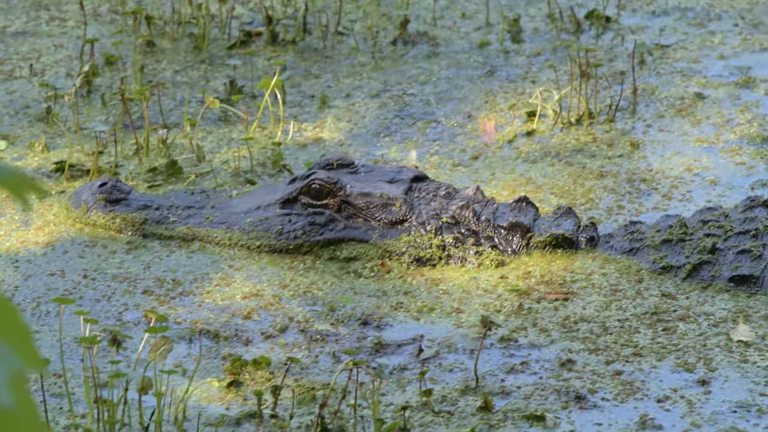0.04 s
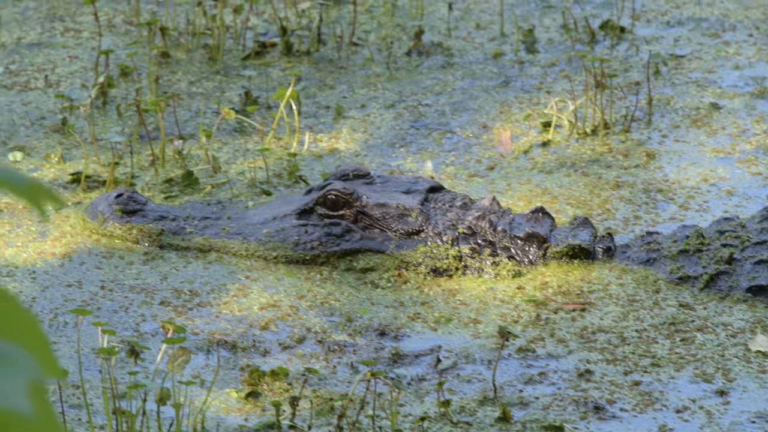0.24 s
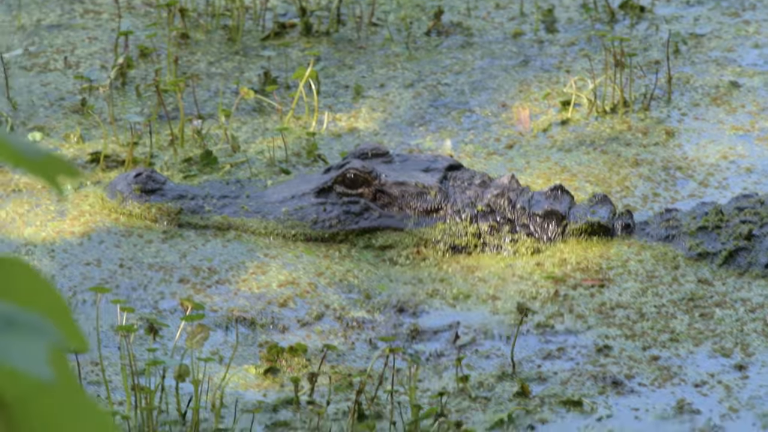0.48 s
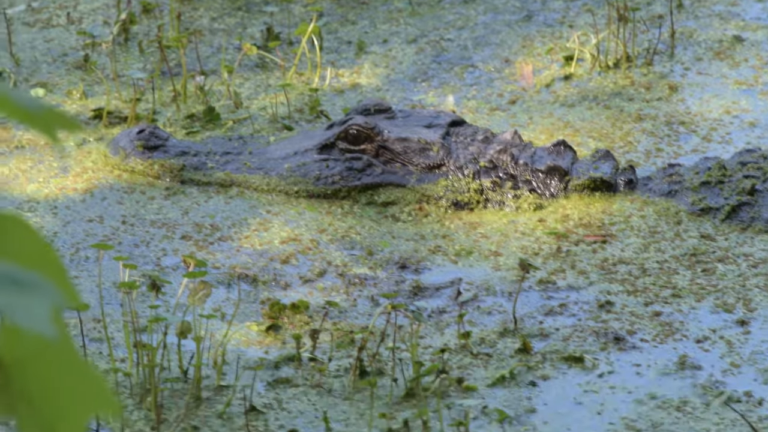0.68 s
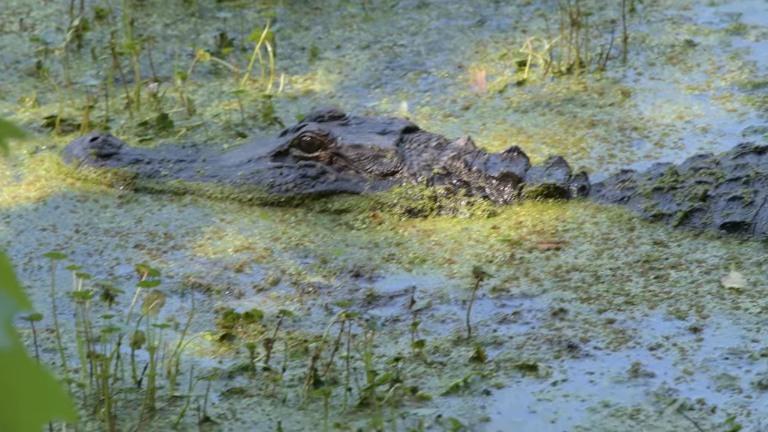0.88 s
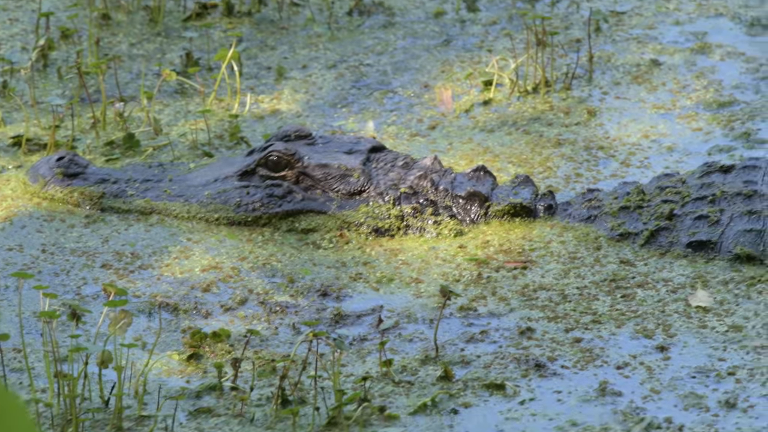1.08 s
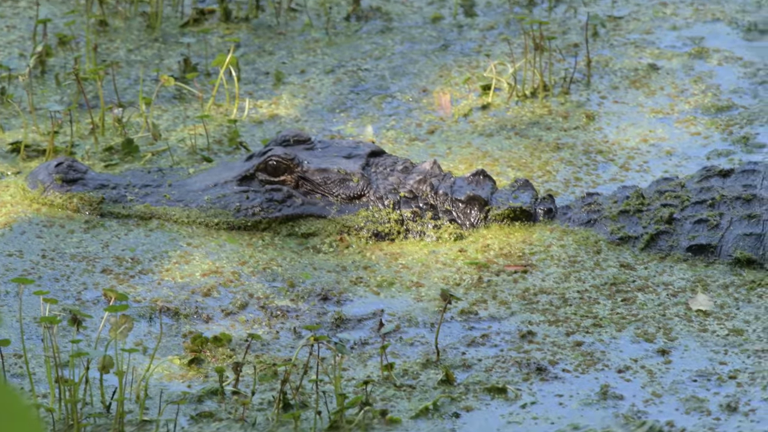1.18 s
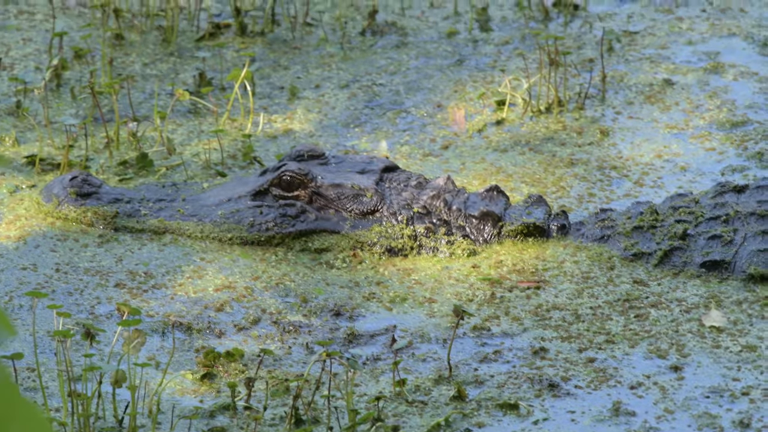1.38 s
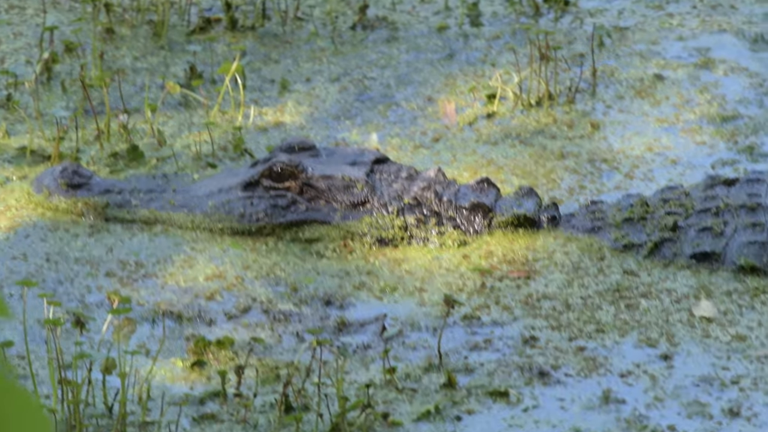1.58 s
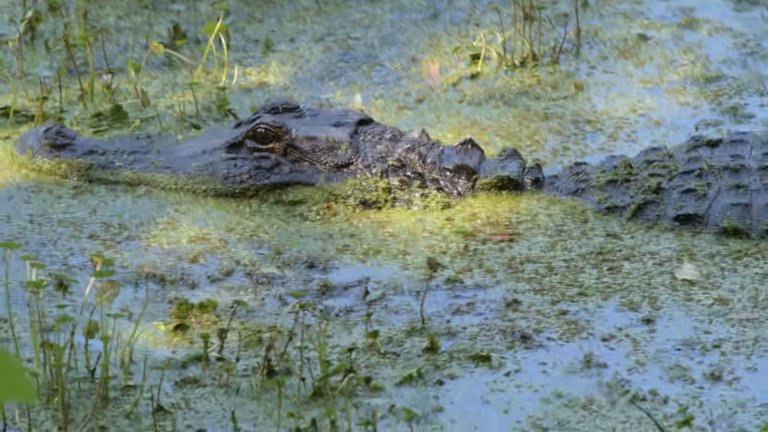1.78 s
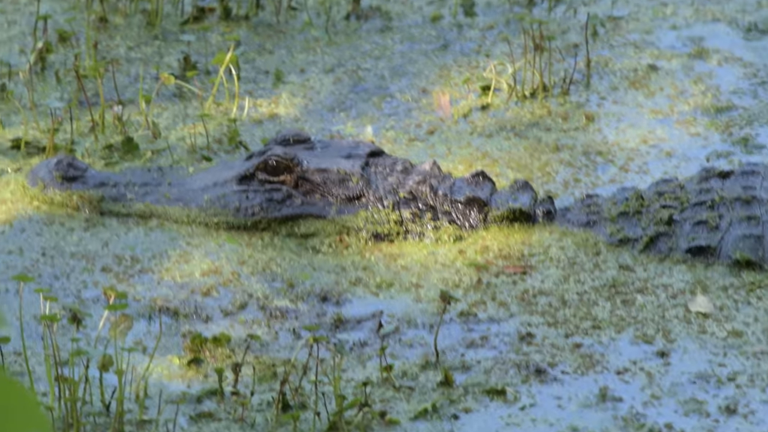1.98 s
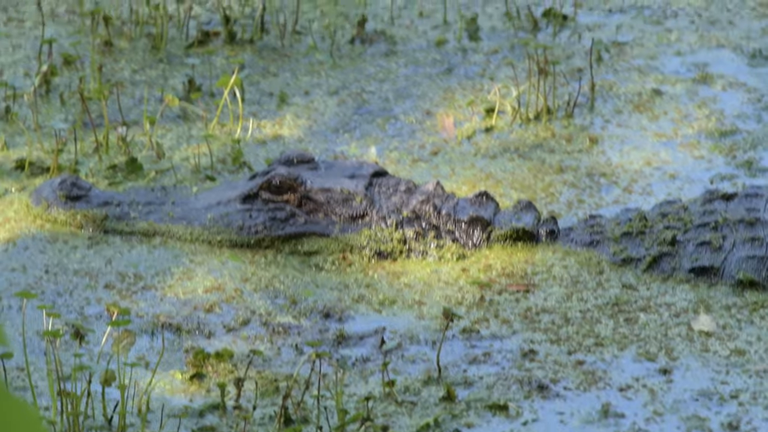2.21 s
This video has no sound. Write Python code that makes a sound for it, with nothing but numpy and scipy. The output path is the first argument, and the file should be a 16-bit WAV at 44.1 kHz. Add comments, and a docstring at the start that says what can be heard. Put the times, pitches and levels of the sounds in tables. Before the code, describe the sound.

One low, gurgling alligator bellow shakes the swamp water into a light fizz and small splashes.

```python
"""A swamp in still air, with an alligator straight ahead of a stereo microphone. It bellows once:
slow throat pulses ring one low resonance, gurgle, slacken and break up into single beats.
Its body heaves, air rasps through its head with every pulse, the shaken water fizzes and a few
droplets splash. All around, insects trill faintly and the water settles; at the end the reeds
rustle and something calls far off."""
import sys
import numpy as np
from scipy import signal
from scipy.fft import rfft, irfft, next_fast_len
from scipy.io import wavfile
from scipy.ndimage import uniform_filter1d, map_coordinates

SR = 44100
rng = np.random.default_rng(int(sys.argv[2]) if len(sys.argv) > 2 else 0)


def to_wav(s):
    """Save 16-bit WAV."""
    ch = np.atleast_2d(s).T  # columns
    pcm = np.round(np.clip(ch, -1, 1) * 32767)  # PCM
    wavfile.write(sys.argv[1], SR, pcm.astype(np.int16))


N = 99225
T = np.arange(N) / SR
START_S, END_S = .198, 1.785  # the bellow

# pulse rate of the throat: t/s, rate/Hz
PULSE_RATE = [(0.198, 45.43), (0.25, 43.31), (0.28, 55.42), (0.45, 59.52), (0.72, 54.76), (0.86, 50.46),
              (1.05, 47.28), (1.35, 38.33), (1.62, 32.16), (1.7, 25.93)]
# throat modes: multiple of the resonance, level/dB, pulse-to-pulse scatter/dB, relative ring length
THROAT_MODES = [(0.639, -4.5, 2.5, 0.8), (1.026, 3, 2, 1.06), (1.65, -19, 5, 1.03), (2.55, -28, 4.5, 1.4)]
# how alike left and right are at the microphone, for the alligator and the swamp: f/Hz, likeness 0-1
GATOR_ALIKE = [(600, 1), (2200, 0.99), (4000, 0.38), (9000, 0.4), (15000, 0.65)]
SWAMP_ALIKE = [(60, 0.93), (250, 1), (600, 0.82), (1500, 0.57), (4000, 0.058), (12000, 0.05)]


def amp(db):
    """Decibels to gain."""
    return 10 ** (np.asarray(db) / 20)


def unit(x):
    """Scaled to rms 1."""
    return x / np.sqrt(np.mean(x ** 2) + 1e-20)


def along(points, hz):
    """(f/Hz, value) points joined on a log frequency axis."""
    f, v = np.transpose(points)
    return np.interp(np.log(hz + 1), np.log(f + 1), v)


def curve(rows, at=T, column=1):
    """One column of a table, joined by straight lines in time."""
    rows = np.asarray(rows)
    return np.interp(at, rows[:, 0], rows[:, column])


def wobble(rate):
    """A smooth random curve, rate knots a second."""
    return map_coordinates(rng.standard_normal(256), [T * rate], mode="wrap")


def filtered(x, response):
    """x through a frequency response."""
    size = next_fast_len(N + SR // 2)
    return irfft(rfft(x, size) * response(np.fft.rfftfreq(size, 1 / SR)), size)[..., :N]


def spread(pair, response, alike=GATOR_ALIKE):
    """Two unrelated signals as a coloured stereo sound of rms 1."""
    turn = lambda hz: np.arccos(np.clip(along(alike, hz), -1, 1)) / 2
    mid, side = filtered(pair, lambda hz: response(hz) * np.array([np.cos(turn(hz)), np.sin(turn(hz))]))
    return unit(np.array([mid + side, mid - side]))


def noise(colour, alike=SWAMP_ALIKE):
    """Stereo noise of rms 1 with a spectrum of (f/Hz, level/dB) points."""
    return spread(rng.standard_normal((2, N)), lambda hz: amp(along(colour, hz)), alike)


def trill(centre_hz, width_hz):
    """A narrow band of noise from out in the swamp."""
    band = lambda hz: 1 / (1 + ((hz - centre_hz) / width_hz * 2) ** 2)
    return spread(rng.standard_normal((2, N)), band, SWAMP_ALIKE)


def notes(rows, width_hz):
    """Trills that each swell and fade on a bell curve."""
    return sum(amp(db) * np.exp(-2 * ((T - s) / length) ** 2) * trill(hz, width_hz)
               for s, length, db, hz in rows)


def patchy(x, depth_db):
    """Brief bright patches scattered over time and frequency."""
    spectra = signal.stft(x, nperseg=512)[2]
    field = uniform_filter1d(rng.standard_normal(spectra.shape[1:]), size=4, axis=0)
    field = uniform_filter1d(field, size=4, axis=1)
    return signal.istft(spectra * amp(depth_db * unit(field)), nperseg=512)[1][:, :N]


def cycles():
    """Throat cycles completed since the bellow began."""
    count = np.cumsum(curve(PULSE_RATE)) / SR
    return count - np.interp(START_S, T, count)


def pulsing(lag_s):
    """Swings between -1 and 1, cresting lag_s after each throat pulse."""
    return np.cos(2 * np.pi * np.interp(T - lag_s, T, cycles()))


def bellowing(attack_s, release_s):
    """Fades in as the bellow starts and out after it ends."""
    return np.clip((T - START_S) / attack_s, 0, 1) * np.clip((END_S + release_s - T) / release_s, 0, 1)


def still_air(level_db=-57):
    """The low hush all around the microphone."""
    # spectrum of the air: f/Hz, relative level/dB
    colour = [(20, -26), (45, -2), (85, 3), (125, -8.5), (180, 4), (250, -7), (470, -26), (620, -11.5),
              (1200, -38), (3000, -28.5), (5900, -28), (6600, -30.5), (15500, -29)]
    return amp(level_db + .7 * wobble(8.03)) * noise(colour)


def settling_water():
    """A soft wash that outlasts the bellow."""
    # swell of the wash: t/s, level/dB
    swell = [(.2, -62.5), (.7, -48.5), (1.6, -48.5), (1.8, -57), (2.05, -56.5), (2.25, -66.5)]
    # its spectrum: f/Hz, relative level/dB
    colour = [(120, -14), (380, 0), (550, -12), (1000, -26), (5000, -24.5), (9000, -37.5)]
    return amp(curve(swell) + 1.16 * wobble(18)) * noise(colour)


def reeds():
    """A soft rustle that comes up at the end."""
    # swell of the rustle: t/s, level/dB
    swell = [(2.03, -64), (2.17, -58.5)]
    # its spectrum: f/Hz, relative level/dB
    colour = [(700, 5.5), (1500, 7.5), (3400, 0), (8000, -50)]
    return amp(curve(swell)) * noise(colour)


def far_call():
    """Two faint notes from far off."""
    # notes of the call: t/s, length/s, level/dB, f/Hz
    call = [(2.145, 0.033, -61.5, 2300), (2.18, 0.024, -57, 2610)]
    return notes(call, width_hz=410)


def insects(swell_db=2.5):
    """Short narrow chirps over a distant, wavering chorus."""
    # bands of the chorus: f/Hz, width/Hz, level/dB
    bands = [(4144, 360, -68), (6000, 200, -77)]
    # single chirps: t/s, length/s, level/dB, f/Hz
    chirps = [(0.15, 0.21, -62, 4350), (1.395, 0.019, -54, 4440), (1.5, 0.039, -62, 4460),
              (1.578, 0.052, -60, 4420), (1.662, 0.019, -54, 4410), (1.787, 0.061, -59, 4430),
              (1.9, 0.033, -57, 4340), (2.015, 0.022, -62, 4320)]
    chorus = sum(amp(db + swell_db * wobble(21.94)) * trill(hz, width) for hz, width, db in bands)
    return chorus + notes(chirps, width_hz=85)


def splashes(attack_s=0.0005):
    """Larger droplets burst on the surface, left and right of the microphone."""
    # sprays: t/s, level/dB, f/Hz, half-width/octaves, t60/s, left over right/dB
    sprays = [ (0.671, -45, 3480, 0.22, 0.091, -2), (0.929, -44, 2620, 1, 0.12, -14),
              (.8016, -29.5, 2750, 1, .018, -2), (.9507, -34, 8500, .5, .02, -2),
              (1.0021, -25, 9500, .28, .011, 4), (1.0465, -24.5, 3050, 1, .017, 3), ]
    out = np.zeros((2, N))
    for s, db, centre, octaves, t60, pan_db in sprays:
        age = np.maximum(T - s, 0)
        band = lambda hz: 1 / (1 + (np.log2((hz + 1) / centre) / octaves) ** 2)
        burst = spread(rng.standard_normal((2, N)), band)
        envelope = amp(db - 60 * age / t60) * (1 - np.exp(-age / attack_s))
        out += burst * envelope * amp([[pan_db / 2], [-pan_db / 2]])
    return out


def fizz(gain_db=6, drops_per_s=1600, drops_db=-5, pulsing_db=2, uneven_db=0.5):
    """Fine spray and tiny drops, thrown up in time with the pulses, a touch left of centre."""
    # swell of the fizz: t/s, level/dB before gain_db
    swell = [(0.19, -66), (0.225, -54), (0.366, -47.5), (0.61, -48), (0.684, -46), (0.704, -50),
             (0.758, -44), (0.816, -53), (0.856, -48.5), (0.886, -53), (0.954, -45), (0.964, -48),
             (1.052, -51), (1.458, -64.5), (1.63, -66), (1.83, -81)]
    # its spectrum: f/Hz, relative level/dB
    colour = [(300, 9), (900, -7), (1600, -13.5), (2700, -5.5), (4200, 0.5), (5300, -2.5), (7000, -7),
              (10000, -0.5), (12500, -4.5), (15500, 2.5)]
    drops = (rng.random((2, N)) < drops_per_s / SR) * rng.standard_normal((2, N))
    spray = noise(colour, GATOR_ALIKE) + amp(drops_db) * spread(drops, lambda hz: amp(along(colour, hz)))
    spray = patchy(spray, depth_db=3)
    shaking = amp(pulsing_db * pulsing(lag_s=0.0026) + uneven_db * wobble(58.1))
    envelope = amp(gain_db + curve(swell)) * bellowing(attack_s=0.0023, release_s=0.18)
    return unit(spray * shaking) * envelope * amp([[.5], [-.5]])


def rasp(pulsing_db=4, climb_width_hz=90):
    """Puffs of air, one a pulse, through the narrow resonances of the head, one of which climbs."""
    # swell of the rasp: t/s, level/dB
    swell = [(.19, -102.5), (.205, -58), (.33, -53), (.65, -51), (.85, -58.5), (1.25, -56), (1.48, -62),
             (1.7, -66.5), (1.82, -87)]
    # steady airway resonances: f/Hz, half-width/Hz, relative level/dB
    airway = [(1217, 26, 8.5), (1842, 31.4, 12.5), (1966, 61, 10), (2413, 55, 7.5), (4640, 62, 6.5)]
    # the climbing resonance: t/s, f/Hz, level/dB relative to the steady ones
    climb = [(.45, 1312, -8.5), (1.25, 1420, -10), (1.52, 1493, -3)]
    puffs = amp(pulsing_db * pulsing(lag_s=0.0037))
    head = lambda hz: sum(amp(db) * (2j * hz * width / (centre ** 2 - hz ** 2 + 2j * hz * width)) ** 2
                          for centre, width, db in airway)
    steady = spread(rng.standard_normal((2, N)) * puffs, head)
    phase = 2 * np.pi * np.cumsum(curve(climb)) / SR
    band = wobble(climb_width_hz) * np.cos(phase) + wobble(climb_width_hz) * np.sin(phase)
    climbing = amp(curve(climb, column=2)) * unit(puffs * band)
    return (steady + climbing) * amp(curve(swell))


def chest(chest_hz=59, q=2.5, fundamental_db=5.5, octave_db=0.5, sway_db=-21):
    """The body heaves at the pulse rate and its octave, each strongest on the chest resonance."""
    # swell of the heaving: t/s, level/dB before the gains and the resonance
    swell = [(0.2, -45), (0.39, -48), (0.712, -46), (1.176, -45.5), (1.33, -40), (1.45, -45.5), (1.62, -47),
             (1.8, -69)]
    heave, rate = pulsing(lag_s=0.0067), curve(PULSE_RATE)
    resonance = lambda hz: 1 / (1 + (q * (hz / chest_hz - chest_hz / hz)) ** 2)
    octave = amp(octave_db + wobble(25.07)) * resonance(2 * rate) * unit(2 * heave ** 2 - 1)
    mid = amp(fundamental_db) * resonance(rate) * unit(heave) + octave
    side = amp(sway_db) * resonance(rate) * unit(pulsing(lag_s=0.0069)) * wobble(13.2)
    envelope = amp(curve(swell) - 0.5 * wobble(11)) * bellowing(attack_s=0.013, release_s=0.022)
    return np.array([mid + side, mid - side]) * envelope


def gurgles(half_length_s=0.0043, rise_hz_per_s=4500):
    """Wet blips a few cycles long, each sliding up in pitch."""
    # each blip at its crest: t/s, level/dB, f/Hz
    blips = [(.211, -41.5, 543), (.231, -46, 620), (.616, -38.5, 370), (.817, -41, 367), (.878, -29.5, 338),
             (.993, -34, 385), (1.172, -35, 396), (1.466, -30, 360), (1.524, -31, 352), (1.612, -33, 322)]
    out = np.zeros(N)
    for s, db, hz in blips:
        t = T - s
        phase = 2 * np.pi * (hz + rise_hz_per_s * t / 2) * t
        out += amp(db) * np.exp(-(t / half_length_s) ** 2) * np.sin(phase)
    return out


def thump(s, hz, db, mode_luck, swell_s=.0069, crest_lag_s=0.00391, tight_loss_db=8):
    """One rounded swell of the throat modes, cresting just after time s."""
    near = np.flatnonzero(abs(T - s) < 1 / 20)
    t = T[near] - s - crest_lag_s
    # slower pulses ring longer
    fall_s = swell_s * (curve(PULSE_RATE).max() / curve(PULSE_RATE, s)) ** 0.15
    # a tight, higher-pitched throat swells more slowly and its lowest mode weakens
    tight = np.interp(hz, [228, 246], [0, 1])
    rise_s = swell_s * (1 + 0.18 * tight)
    ring = np.zeros(len(t))
    for luck, (ratio, mode_db, scatter_db, length) in zip(mode_luck, THROAT_MODES):
        age = np.maximum(1 + t / np.where(t < 0, rise_s, fall_s * length), 0)  # 1 at the crest
        envelope = (age * np.exp(1 - age)) ** 2
        level_db = db + mode_db + scatter_db * luck - tight_loss_db * tight * (ratio < 1)
        ring += amp(level_db) * np.cos(2 * np.pi * hz * ratio * t) * envelope
    return np.bincount(near, ring, N)


def throat(jitter_s=.0003, scatter_db=4, pitch_scatter=.025, flap_pitch_ratio=1.1, beat_clear_s=.01):
    """Each pulse, and a higher flap after it, rings the throat; a marked beat replaces its pulse."""
    # effort of the bellow: t/s, level/dB into the modes, resonance f/Hz
    effort = [(0.283, -37.5, 198), (0.305, -26, 202), (0.39, -25, 205.5), (0.48, -28.5, 211),
              (0.69, -27.5, 209.2), (0.77, -29.5, 233), (0.82, -33, 212), (0.91, -29, 211.5),
              (0.975, -32.5, 179), (1.0, -31.5, 215), (1.06, -34, 180), (1.085, -33, 223),
              (1.17, -26.5, 214), (1.25, -33, 211), (1.41, -30, 228.5), (1.5, -31, 222.3), (1.65, -38, 218)]
    # second flap inside each cycle: t/s, size relative to the pulse
    flap = [(.28, 0.06), (.7, 0.07), (0.76, 0.45), (1.04, 0.34), (1.34, 0.34), (1.44, 0.42), (1.64, 0.55),
            (1.71, 0.2)]
    # beats that stand out of the roll: t/s, level/dB into the modes, resonance f/Hz
    beats = [(0.202, -28, 250), (0.2222, -25, 221), (.241, -26, 230), (0.2647, -27.5, 203),
             (0.4736, -21.5, 208), (.63, -21.5, 215.5), (1.1676, -25, 219), (1.687, -37, 256),
             (1.704, -42, 257), (1.726, -37, 258), (1.765, -36.5, 247)]
    count, out = cycles(), np.zeros(N)
    pulses = int(np.interp(END_S, T, count)) + 1
    draws = rng.standard_normal((pulses, 5 + len(THROAT_MODES)))
    for k, (place, detune, jitter, size, flap_size, *mode_luck) in enumerate(draws):
        flap_at = 0.5924 + 0.063 * place  # share of the cycle
        s, flap_s = np.interp([k, k + flap_at], count, T)
        if any(abs(s - beat[0]) < beat_clear_s for beat in beats):
            continue
        db = curve(effort, s)
        hz = curve(effort, s, column=2) * (1 + pitch_scatter * detune)
        out += thump(s + jitter_s * jitter, hz, db + scatter_db * np.tanh(size), mode_luck)
        flap_db = db + scatter_db * np.tanh(flap_size)
        out += curve(flap, s) * thump(flap_s, hz * flap_pitch_ratio, flap_db, mode_luck)
    return out + sum(thump(s, hz, db, np.zeros(len(THROAT_MODES))) for s, db, hz in beats)


def scene():
    """The alligator straight ahead of the microphone, the swamp all around."""
    alligator = throat() + gurgles() + chest() + rasp()
    shaken_water = fizz() + splashes()
    swamp = insects() + far_call() + still_air() + settling_water() + reeds()
    return alligator + shaken_water + swamp


def record(dry):
    """The recorder drops the deepest rumble and everything above its band limit."""
    low_cut_hz, top_hz = 14, 15880
    return filtered(dry, lambda hz: (1j * hz / (1j * hz + low_cut_hz)) ** 2 * (hz < top_hz))


dry = scene()
out = record(dry)
to_wav(out)
```